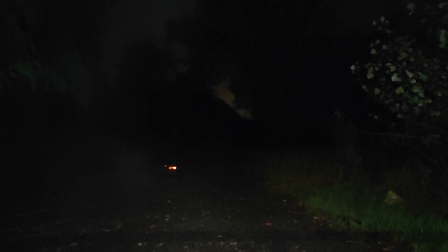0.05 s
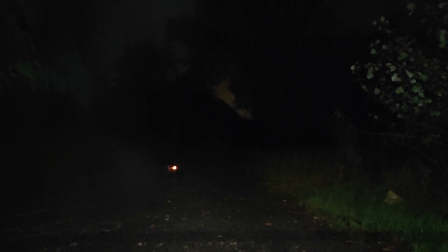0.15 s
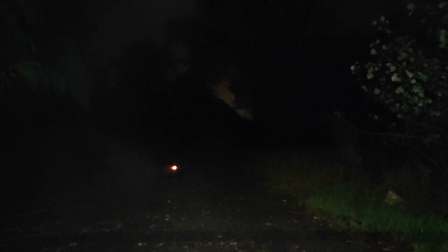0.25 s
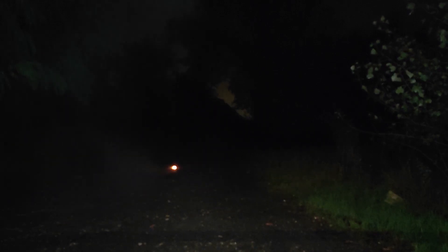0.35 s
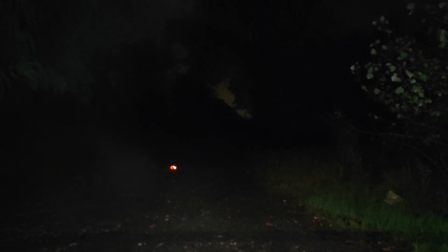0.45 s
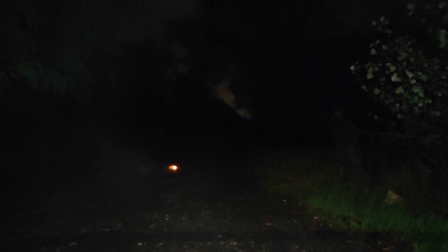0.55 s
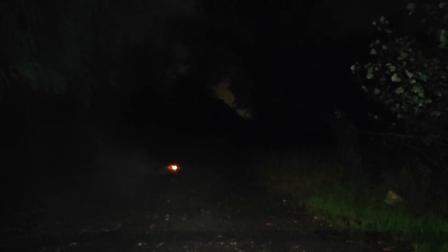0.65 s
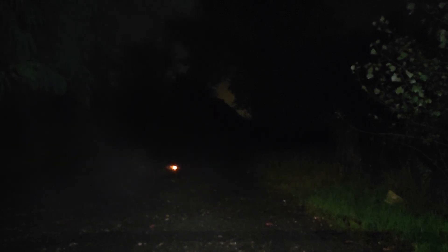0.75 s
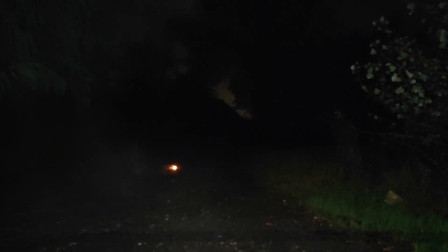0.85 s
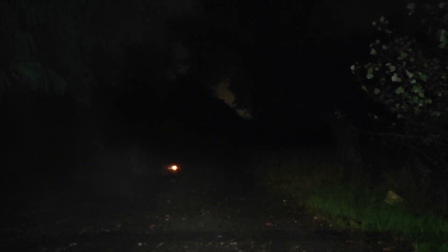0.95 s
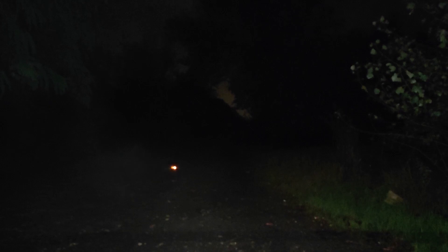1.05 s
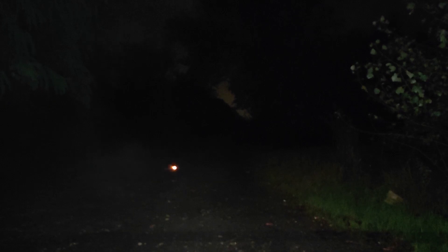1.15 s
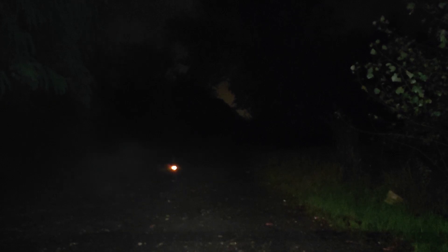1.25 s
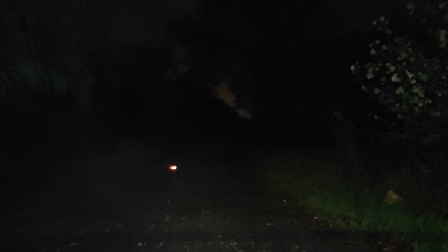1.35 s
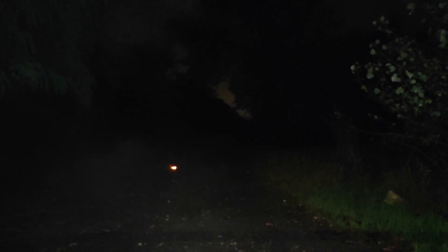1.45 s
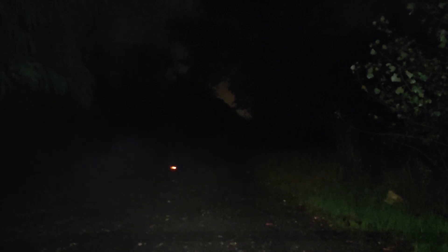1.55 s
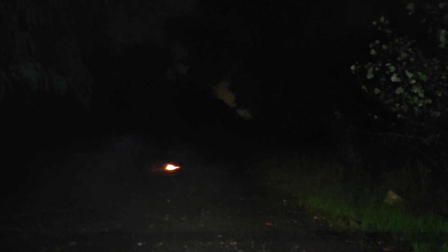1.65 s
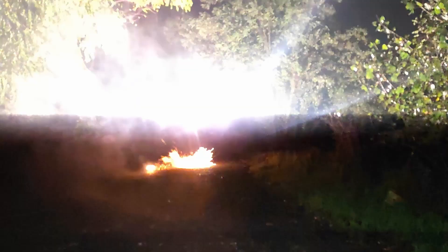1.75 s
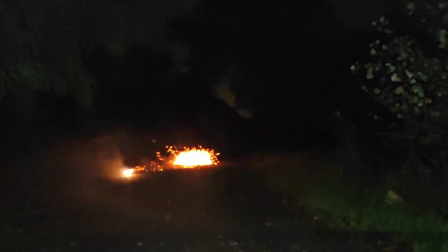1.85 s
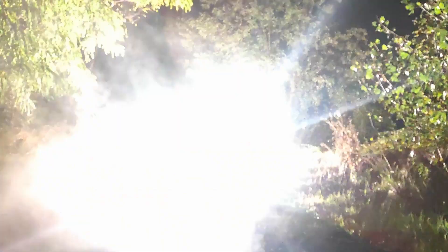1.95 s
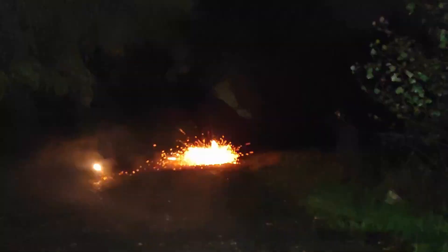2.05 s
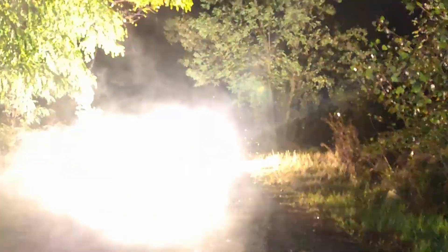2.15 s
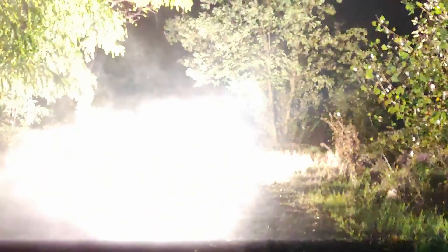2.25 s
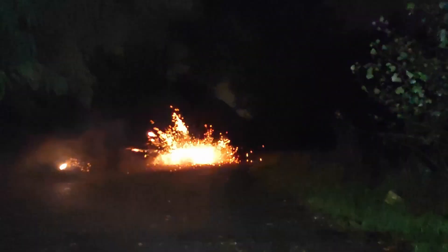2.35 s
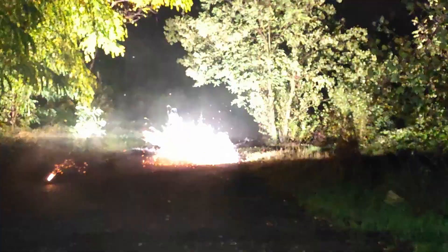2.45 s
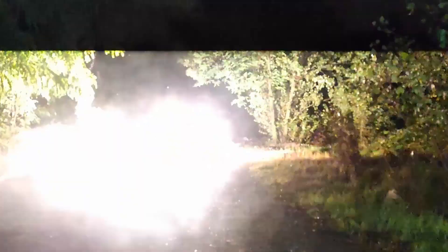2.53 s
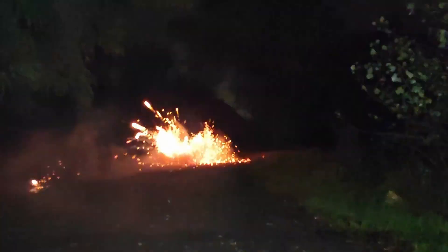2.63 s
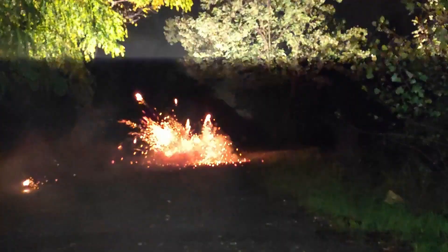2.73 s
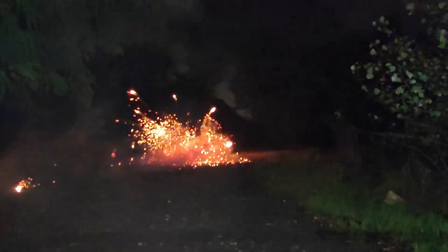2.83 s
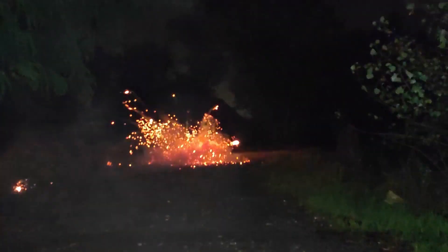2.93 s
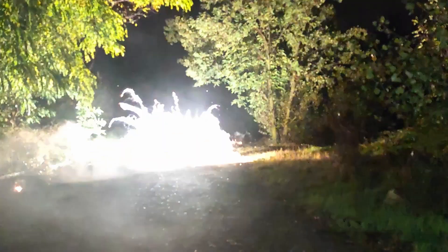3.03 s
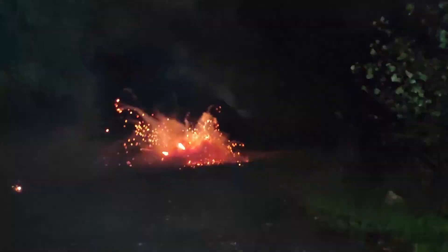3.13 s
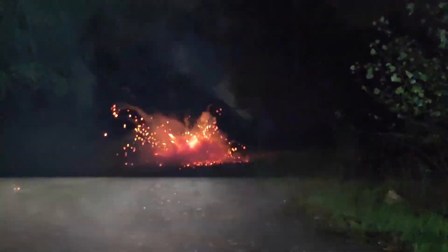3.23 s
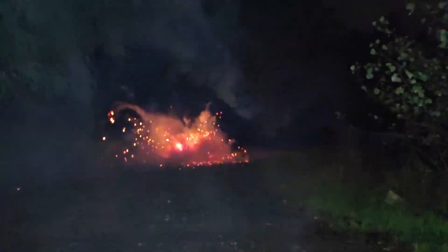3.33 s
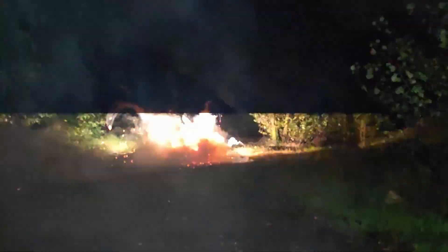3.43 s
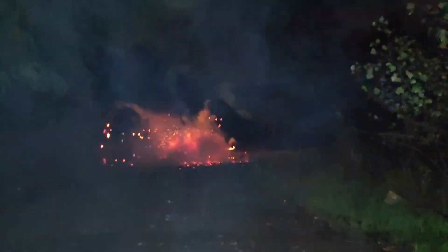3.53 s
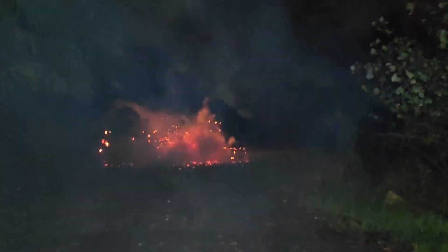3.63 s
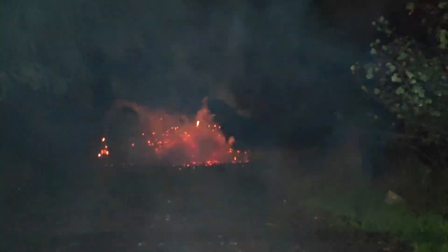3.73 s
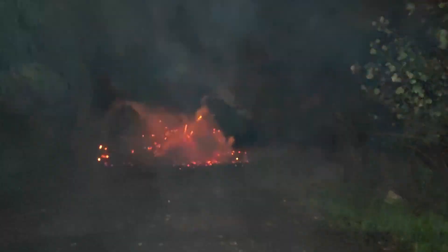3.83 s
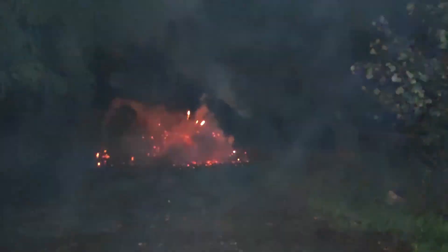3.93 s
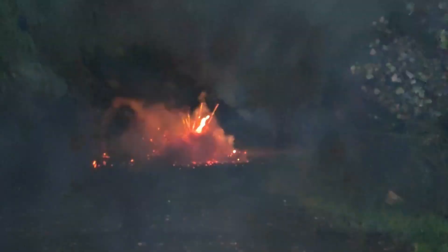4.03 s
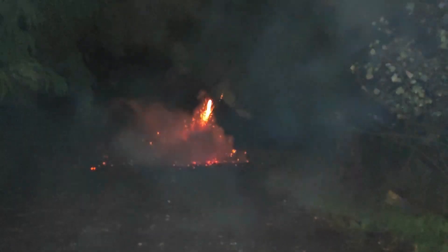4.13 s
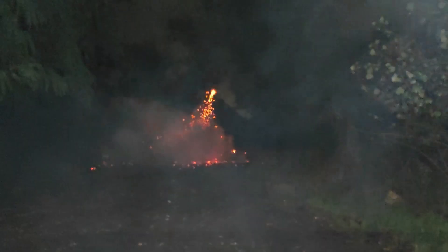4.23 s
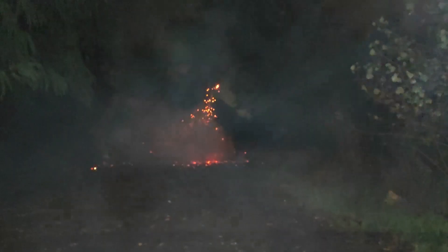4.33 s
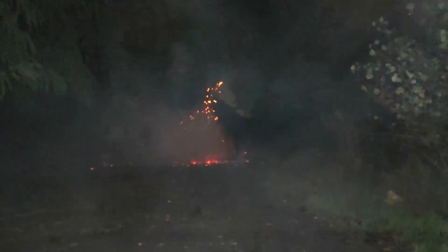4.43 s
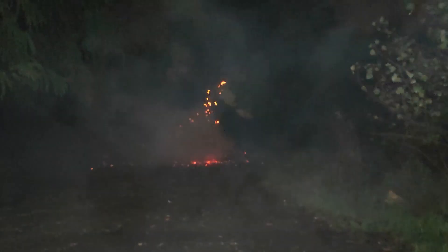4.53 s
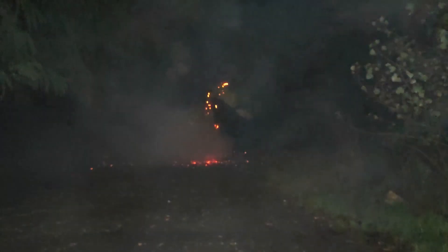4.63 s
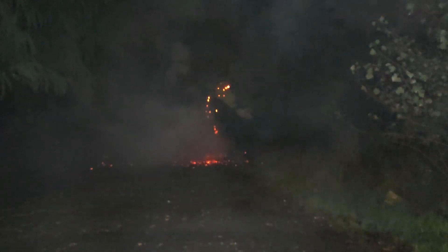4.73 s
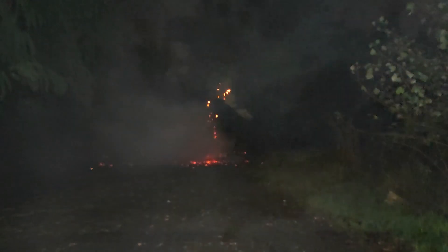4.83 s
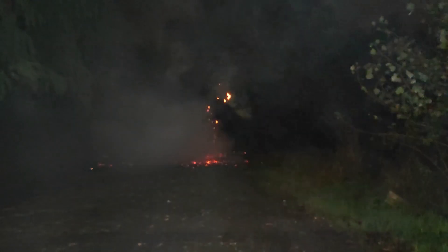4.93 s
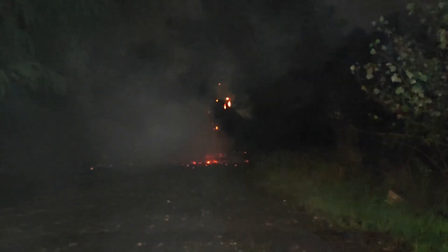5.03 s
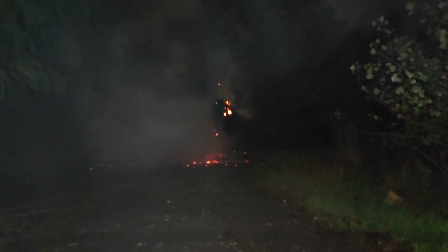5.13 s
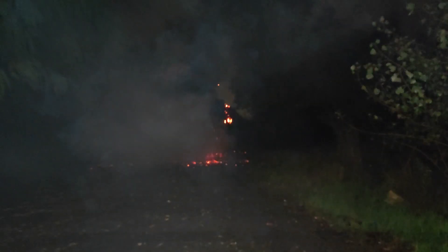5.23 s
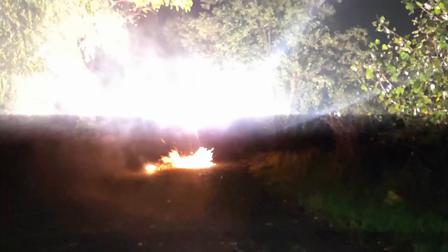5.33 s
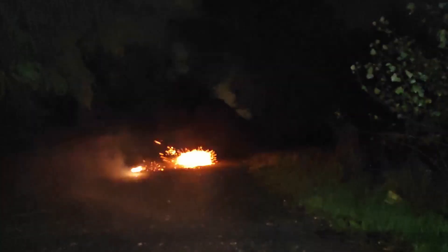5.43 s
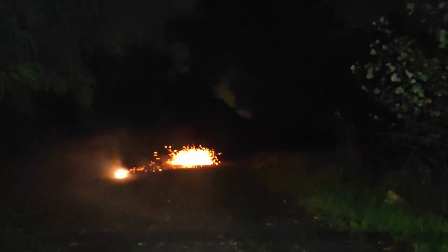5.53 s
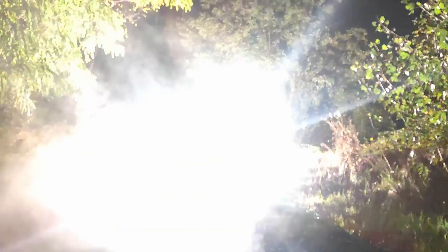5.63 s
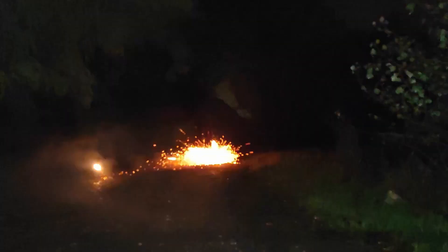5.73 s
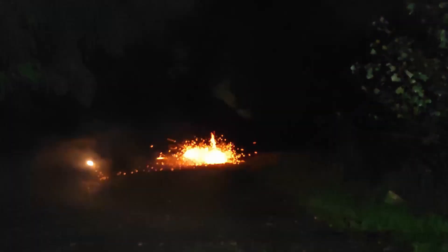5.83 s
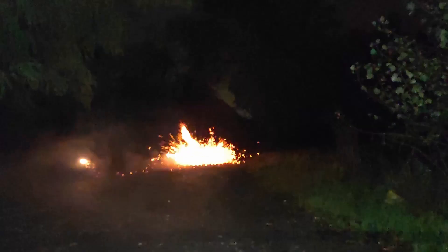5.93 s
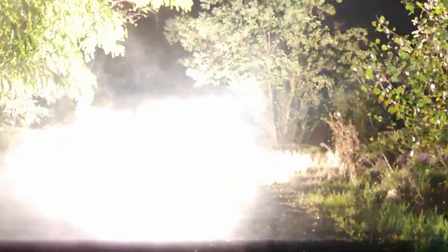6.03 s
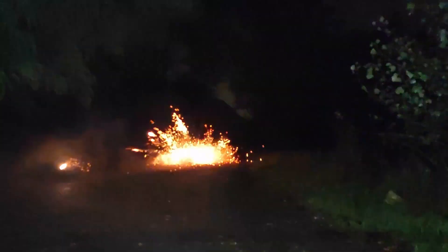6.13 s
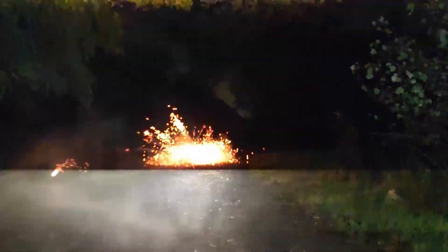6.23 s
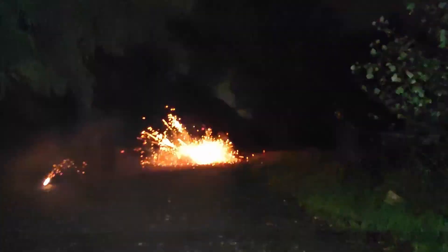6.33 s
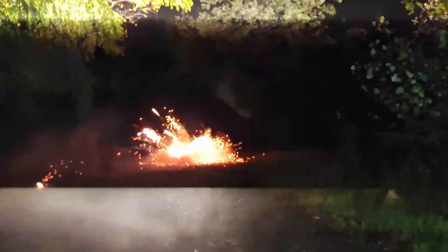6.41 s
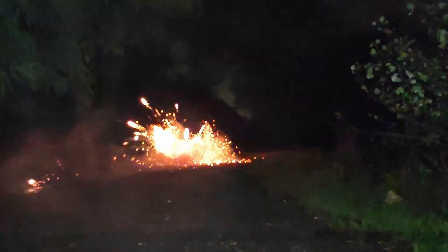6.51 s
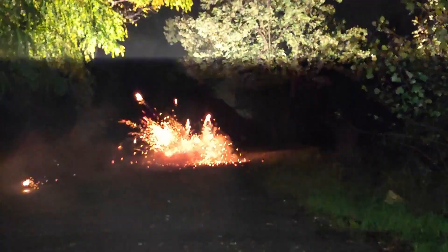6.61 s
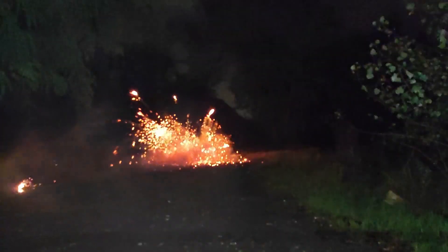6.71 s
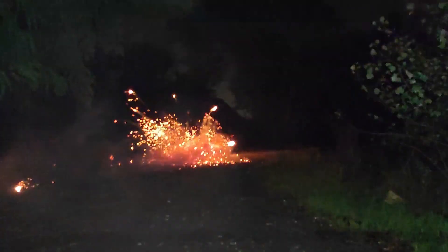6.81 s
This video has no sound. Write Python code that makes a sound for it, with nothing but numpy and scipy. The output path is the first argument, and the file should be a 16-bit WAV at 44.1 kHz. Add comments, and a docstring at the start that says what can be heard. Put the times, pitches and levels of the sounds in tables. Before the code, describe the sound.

Nearly two seconds of quiet night hiss, then an abrupt, overloaded barrage of firecrackers between trees, heard in wide stereo on a phone nearby. Sharp bangs poke out of a continuous popping roar that dulls after each one. A hollow, uneven far rumble follows and fades. After a brief abrupt hush, another loud burst arrives, with rounder, heavier thuds amid washed-out clatter, still going when it ends.

```python
"""Firecrackers on a wet lane

A burst of firecrackers between trees at night, a phone some metres away, then a second stretch that sounds
as if slowed down, its bangs blunt and smeared. Blast waves, shaped as pulses, stand out of a roar of popping
noise that dulls after each bang. After the first burst low rings in a rolling far rumble are cut to a brief
near silence; a faint night hiss lies under it all. The phone's limiter ducks the loudest peaks."""
import sys
import numpy as np
from scipy import signal
from scipy.fft import rfft, irfft
from scipy.io import wavfile
from scipy.ndimage import uniform_filter1d, minimum_filter1d

SR = 44100
rng = np.random.default_rng(int(sys.argv[2]) if len(sys.argv) > 2 else 0)


def wrap_up_sound(samples):
    """Save the sound to the file named by the first command line argument, as 16-bit audio."""
    columns = np.atleast_2d(samples).T
    # keep every value between -1 and 1, then stretch to whole-number steps
    tamed = np.clip(columns, -1, 1)
    steps = np.round(tamed * 32767).astype(np.int16)
    wavfile.write(sys.argv[1], SR, steps)


N = 302967

# Blasts that reach the phone directly. Each row: time in seconds, nominal level of the suck in dB, centre in Hz,
# push length in ms, push in dB and rebound in dB against the suck, tree echoes in dB against the blast,
# treble power it gives the roar in dB.
BLASTS = [(1.8890, -1.5, 520, 0.36, -4.5, -2.5, -16.5, -5.5), (2.053, -17, 240, .3, -6, -18, -27, -9),
          (2.1085, -1, 560, 0.63, -19, -14, -10.5, -3), (2.3063, -1, 480, 0.69, -14, -4.5, -15, -3),
          (2.404, -2.5, 363, 0.62, -14, -13, -32, -6.5), (2.5477, 1, 304, 0.66, -8, -16, -28, -6),
          (2.5964, -1, 350, 0.85, -1, -17, -42, -10), (2.684, -1.5, 298, 0.77, -6.5, -15, -22, -5),
          (2.7324, -4, 330, 0.87, 3, -10, -13.5, -12), (2.8581, 0, 357, 0.7, -3, -17, -19, -9.5),
          (3.1296, 3.5, 400, 0.13, -1, -17, -20, -6), (3.1794, -5, 340, 0.56, 2, -15, -16.5, -15),
          (3.234, -5, 330, 0.73, -1, -17, -23, -6.5), (3.404, -0.5, 334, 0.84, 0, -19, -26, -7),
          (3.5345, -4.5, 275, 0.47, 1, -18, -29, -6.5), (3.6009, -6, 298, 0.24, 4, -15, -32, -7),
          (3.752, 1.5, 445, 0.34, 0, -32, -15, -7.5), (3.9349, -1.5, 302, 0.43, 4.5, -16, -26, -4.5),
          (3.9390, -8, 900, 0.47, -1, -19, -15.5, -12), (4.019, -0.5, 270, 0.36, 0, -17, -21, -14),
          (4.1301, -0.5, 219, 0.51, -11, -5, -12, -5.5)]
# Blunt bangs of the second burst. Each row: time in seconds, nominal level in dB, centre in Hz, width in ms,
# signed gain (positive a hump, negative a hollow), tree echoes in dB against the thud,
# treble power it gives the roar in dB.
THUDS = [(5.496, -8, 131, 3.1, -1.04, -13, -0.5), (5.715, -12, 252, 2, 0.87, -32, -5),
         (5.7900, -12, 440, 1.6, 1, -9, -1.5), (6.053, -6, 180, 4.2, 0.88, -11, -1),
         (6.183, -3.5, 280, 1.4, 1, -34, -4), (6.3734, -2.5, 235, 2.1, 1, -15, -7.5),
         (6.435, -9, 300, 1.2, 1, -32, -12), (6.4396, -3.5, 310, 2.5, 1, -36, -8),
         (6.557, -3, 260, 1.3, 0.85, -9, -6), (6.6206, -7, 343, 2.6, -1.16, -10, -3.5),
         (6.7882, -5, 213, 2.3, -1.1, -12.5, -5)]
# Crackers broken up by trunks and leaves. Each row: time in seconds, nominal level in dB, centre in Hz,
# crack against body in dB.
CLATTERS = [(1.837, -26, 690, 16), (1.865, -10, 640, -2), (1.911, -10, 430, -6), (1.941, -24, 550, 2),
            (1.957, -9.5, 550, 0), (2, -17, 390, -3), (2.047, -14, 500, 7), (2.076, -17, 408, -11),
            (2.131, -6, 570, -20), (2.166, -9, 603, -4), (2.188, -6, 625, -17), (2.228, -12, 597, 3),
            (2.256, -13, 530, -1), (2.278, -10, 537, -3), (2.329, -9.5, 567, -13), (2.377, -12, 500, 2),
            (2.427, -12, 523, -17), (2.453, -11, 500, -14), (2.465, -12.5, 350, 4.5), (2.498, -13, 606, 0),
            (2.56, -13, 450, -14), (2.643, -14.5, 500, -1), (2.882, -18, 500, -13), (2.69, -9, 500, 0.5),
            (2.707, -9, 506, -11), (2.757, -9, 457, -14), (2.843, -10, 330, 0), (2.901, -10, 500, -3),
            (2.909, -9, 440, 0.5), (2.966, -10, 510, 2.5), (3.073, -9, 292, -7), (3.088, -10.5, 380, -3),
            (3.111, -4.5, 540, -1), (3.281, -8, 443, 3), (3.337, -10.5, 500, -2), (3.386, -15, 337, -6),
            (3.447, -7, 467, -1.5), (3.502, -18, 420, 6), (3.573, -14, 500, 4.5), (3.636, -10.5, 480, 3),
            (3.694, -11.5, 397, 4), (3.791, -8.5, 565, -1.5), (3.847, -9.5, 310, 2), (3.969, -9, 464, -7),
            (3.975, -21, 1210, -3), (4.055, -8.5, 520, 1.5), (4.109, -8, 367, -5), (5.46, -9, 526, -2),
            (5.52, -7, 657, -15), (5.538, -20, 450, -9), (5.566, -16, 550, -3), (5.585, -12.5, 510, -5),
            (5.745, -11, 550, -7), (5.904, -18, 450, -11), (6.138, -11, 250, -2), (6.455, -11, 500, -1),
            (6.572, -10.5, 450, 0.5), (6.645, -10, 480, -5), (6.745, -14, 400, -5), (5.818, -7, 620, -15),
            (5.875, -9.5, 620, -2), (5.891, -6, 700, -16), (6.014, -10, 454, -15), (6.082, -9, 617, -14),
            (6.119, -13, 1110, -7), (6.146, -17, 380, 6), (6.216, -13.5, 568, -14), (6.26, -11, 500, 3.5),
            (6.297, -11, 400, -5), (6.692, -14, 680, -7), (6.767, -7, 380, -18), (6.848, -7, 455, -1)]
# Level of the roar of small crackers, one curve a burst. Each row: time in seconds, relative level in dB.
ROAR_LEVELS = [
    [(1.68, -81), (1.77, -52.5), (1.826, -26.5), (1.838, -22), (1.85, -24), (1.864, -15.5), (1.876, -23),
     (1.9, -22), (2.5, -20.5), (2.82, -20), (2.93, -20.5), (3.07, -25), (3.16, -20.5), (3.5, -22.5),
     (4.08, -21), (4.18, -17), (4.36, -23), (4.42, -23.5), (4.59, -30.5), (4.65, -24.5), (4.8, -28.5),
     (4.95, -36.5), (5.305, -42.5), (5.32, -52)],
    [(5.32, -56), (5.35, -48), (5.415, -28), (5.428, -19.5), (5.442, -20.5), (5.46, -17.5), (5.484, -25.5),
     (5.5, -17.5), (5.52, -22.5), (5.95, -20.5), (6.03, -21), (6.87, -21)],
]
# Tone of the roar. Each row: frequency in Hz, relative level in dB per Hz.
ROAR_COLOUR = [(35, -42), (60, -9), (197, 0.5), (436, 1), (1370, -4), (1940, -5), (3020, -7.5),
               (4590, -14.5), (5040, -13), (6990, -21), (8030, -20.5), (8820, -33.5), (9600, -30),
               (11100, -30), (15800, -31)]
# Moments up to which each burst's opening treble is held, in seconds.
FRESH_UNTIL_S = [1.71, 5.43]
# Low echoes from far away. Each row: time of the hump in seconds, peak in dB, ring in Hz.
FAR_RINGS = [(4.1645, -6.5, 296), (4.194, -6, 171), (4.2202, -5, 218), (4.3152, -8, 180), (4.350, -7, 170),
             (4.391, -12, 130), (4.4349, -2, 169), (4.4381, -2, 230), (4.5112, -2.5, 163),
             (4.5713, -11, 170), (4.699, -4, 160.3), (4.737, -6, 120), (4.7492, -10, 169),
             (4.7727, -9, 190), (4.7782, -11, 190), (4.825, -16, 160), (4.9915, -16, 166),
             (5.155, -18, 180), (5.2143, -11, 151)]
# Level of the far rumble. Each row: time in seconds, relative level in dB.
RUMBLE_LEVEL = [(4.1, -25), (4.126, -21), (4.3, -19), (4.47, -15), (4.525, -11.5), (4.556, -19),
                (4.756, -13), (4.968, -22.5), (5.08, -25), (5.222, -22.5), (5.303, -26), (5.318, -39)]
# Tone of the far rumble. Each row: frequency in Hz, relative level in dB per Hz.
RUMBLE_COLOUR = [(25, -12), (45, -10), (70, 10), (120, 13), (200, 12), (320, 4.5), (600, -10), (1200, -16),
                 (2400, -52)]
# Tone of the night air. Each row: frequency in Hz, relative level in dB per Hz.
NIGHT_COLOUR = [(12, -36), (20, -6), (95, -4), (215, -13), (300, -18), (345, -18.5), (1150, -24.5),
                (1250, -24), (7650, -42.5), (8790, -49), (15800, -36)]
# How alike left and right are, before the ripple of the tree lines. Each row: frequency in Hz, correlation.
LIKENESS = [(25, 0.5), (60, 0.92), (130, 0.97), (290, 1), (640, 0.51), (1300, -0.16), (2500, 0.15),
            (7000, 0.1), (15000, 0.15)]
# The same for the far rumble. Each row: frequency in Hz, correlation.
FAR_LIKENESS = [(25, .9), (60, .998), (200, .998), (400, 1), (800, .5), (1600, 0)]
# Stereo balance. Each row: frequency in Hz, left minus right in dB.
BALANCE_DB = [(60, -1.5), (110, 0.5), (200, -0.5), (380, 0), (700, -0.5), (1290, -1.5), (2380, 0.5),
              (4400, 1.5), (8120, 0), (15000, 3.5)]

SECOND_BURST_S = 5.32
TIME_S = np.arange(N) / SR
HZ = np.maximum(np.arange(N // 2 + 1) * SR / N, 1.)  # frequency grid, kept above zero for logarithms


def bangs():
    """Blasts and thuds at both ports, with echoes scattered by the trees and a knock to the membranes."""
    lead_s, right_lag_s = 0.012, 0.00032
    out = np.zeros((2, N))
    t = np.arange(int(.4 * SR)) / SR
    waves = []
    for s, db, hz, push_ms, push_db, rebound_db, echo_db, _ in BLASTS:
        waves.append((s, db, echo_db, 0, blast(t - lead_s, hz, push_ms, push_db, rebound_db)))
    for s, db, hz, width_ms, sign, echo_db, _ in THUDS:
        waves.append((s, db, echo_db, right_lag_s, sign * thud(t - lead_s, hz, width_ms)))
    opposite = np.array([[1], [-1]])  # left up, right down
    chance = rng.standard_normal((len(waves), 3, len(t)))
    for (s, db, echo_db, lag_s, wave), (*noise, luck) in zip(waves, chance):
        # a weaker copy follows about 1.4 ms later
        copy_lag = int(0.00138 * SR * undb(5.1 * luck[0]))
        wave = wave + undb(-12.0) * np.roll(wave, copy_lag)
        right = np.roll(wave, int(lag_s * SR + 3 * abs(luck[1])))
        ports = np.array([wave, right]) * undb(luck[2] * opposite)

        echoes = np.array(noise) * np.exp(-t / 0.0041) * np.minimum(t / 0.0058, 1)
        scatter = signal.fftconvolve(echoes, wave[None, :1200])[:, :len(t)]
        scatter = band_pass(scatter, 310.0, 3600.0) * undb(echo_db)
        # the lows reach both ports alike
        scatter = scatter[0] + opposite * 1.2 * band_pass(scatter[1], 450.0, 8000.)

        # the blast knocks both membranes off centre; they creep back and swing past rest
        age = np.maximum(t - lead_s, 0)
        creep = (1 - age / 0.061) * np.exp(-age / 0.078) * (1 - np.exp(-age / 0.0023))
        push = -1 + 0.33 * luck[3] + 0.49 * luck[4:6, None]
        knock = push * undb(-25.0) * creep
        add(out, s - lead_s, undb(db) * (ports + scatter) + knock)
    return out


def blast(t, hz, push_ms, push_db, rebound_db):
    """A push that snaps over into a suck at t = 0, then swings back."""
    push = undb(push_db) * np.sin(np.pi * np.clip(-t / (push_ms / 1000), 0, 1)) ** 0.5
    late = np.maximum(t, 0)
    suck = (1 - np.exp(-late / 0.000096)) * np.exp(-(late * hz / 0.45) ** 2)
    back = np.maximum(late - 0.39 / hz, 0) / 0.00093
    rebound = undb(rebound_db) * back * np.exp(1 - back)
    wave = signal.lfilter(*signal.butter(2, 3200.0 / (SR / 2)), push - 1.13 * suck + rebound)
    return signal.lfilter(*signal.butter(1, 0.083 * hz / (SR / 2), "high"), wave)


def thud(t, hz, width_ms):
    """A pointed hump between dips, an overtone on its tip and a slow thump under it."""
    hull = np.exp(-(np.abs(t) / (width_ms / 1000)) ** 1.85)
    overtone = 0.5 * np.cos(2 * np.pi * 2.15 * hz * t + 0.55)
    swing = np.cos(2 * np.pi * hz * t) + overtone
    thump = 0.27 * np.sin(2 * np.pi * 140.0 * t) * np.exp(-(t / 0.0032) ** 2)
    return 0.8 * swing * hull + thump


def clatters():
    """Crackers heard as a few ms of close echoes: a body largely shared by both sides under a wide crack."""
    out = np.zeros((2, N))
    t = np.arange(int(.04 * SR)) / SR
    hull = (t / .0025) * np.exp(1 - t / 0.0036)
    chance = rng.standard_normal((len(CLATTERS), 3, len(t)))
    for (s, db, hz, crack_db), (left, right, shared) in zip(CLATTERS, chance):
        sides = np.array([left, right])
        # trunks return the body
        body = unit(band_pass(hull * (shared + 0.14 * sides), 0.5 * hz, 1.56 * hz))
        crack = unit(band_pass((hull + 0.47 * np.exp(-t / 0.016)) * sides, 940.0, 3600.0))
        add(out, s - .0025, undb(db - 15.0) * (body + undb(crack_db) * crack))
    return out


def roar():
    """Dense crackers in third-octave bands; the longer the path, the more treble the air takes."""
    bright_db = -19.5  # treble power at which the air leaves the colour as it is
    dip_db, treble_db, body_db = freshness()
    first_db, second_db = (along_time(burst) for burst in ROAR_LEVELS)
    level_db = np.where(TIME_S < SECOND_BURST_S, first_db, second_db) + dip_db
    level_db[:int(ROAR_LEVELS[0][0][0] * SR)] = -120

    both = stereo(*(rng.standard_normal((2, N)) + sharp_fronts()), ROAR_COLOUR)
    pops = crackle(per_s=220., spread_db=1.0, tail_s=0.0092, wash=0.091)
    out, reference = 0, 0
    for third in range(-13, 14):
        hz = 1000 * 2 ** (third / 3)
        window = np.cos(np.clip(3 * np.log2(HZ / hz), -1, 1) * np.pi / 2) ** 2
        # leaves scatter the treble most, so single pops survive in the lower bands
        popping = irfft(both * window, N) * unit(pops ** (1.38 / (1 + hz / 2000.0)))
        if 1 < third < 8:  # the middle bands set the overall level
            reference += np.mean(popping ** 2)
        air_db = (treble_db - bright_db) * (np.minimum(hz / 11900.0, 1) ** 0.88 - .25)
        body_share = 1 / (1 + (hz / 990.0) ** 2) + 1.4 / (1 + (hz / 83.0) ** 4)
        out = out + popping * undb(air_db + body_db * body_share + 1.06 * walk(14.))
    return (out / np.sqrt(reference) + membrane_wander()) * undb(level_db + 1.0)


def sharp_fronts():
    """Single sharp fronts, in mid and in side, that prick out of the wash and die out late in the first burst."""
    size_db = 7.0 + np.minimum(3.1 * rng.exponential(size=(2, N)), 8.)
    fronts = (rng.random((2, N)) < 500. / SR) * undb(size_db)
    fading = np.exp(-np.maximum(TIME_S - 4.25, 0) / 0.21)
    # one sign in mid and in side during the first burst, either sign in the second
    return fronts * np.where(TIME_S < SECOND_BURST_S, fading, rng.choice([-1, 1], size=(2, N)))


def membrane_wander():
    """The steady pounding lets the membranes wander slowly, further in the second burst."""
    wander_db = -17.5 + 2 * (TIME_S > SECOND_BURST_S)
    apart = np.array([walk(8.1), walk(12.0)])
    return band_pass(undb(wander_db) * (walk(21.0) + 0.4 * apart), 2.5, 35.)


def crackle(per_s, spread_db, tail_s, wash):
    """Envelope of random pops of uneven size, each smeared by the leaves, over a wash of older echoes."""
    size_db = np.minimum(spread_db * rng.exponential(size=N), 7.)
    pops = (rng.random(N) < per_s / SR) * undb(size_db)
    power = signal.lfilter([1], [1, -np.exp(-1 / (tail_s * SR))], pops ** 2)
    power = uniform_filter1d(power, size=60)
    return np.sqrt(wash + power / power.mean())


def freshness():
    """Each bang refreshes the roar, which dulls as echoes travel on: level dip, treble and body, in dB."""
    opening_treble_db = -6  # held while a burst opens
    # body before band weighting: at a bang, long after it, before the first bang of a burst
    full_body_db, thin_body_db, opening_body_db = 5.5, -4, -16.5
    times = np.array([row[0] for row in BLASTS + THUDS])
    onsets = [(row[0], row[-1]) for row in BLASTS + THUDS]
    onsets += [(until, opening_treble_db) for until in FRESH_UNTIL_S]
    # treble sinks fast at first, then more slowly
    early = after(onsets, db_per_s=73.5)
    late = undb(2 * -19) * after(onsets, db_per_s=30.5)
    bright = early + late + 1e-9

    last = np.searchsorted(times, TIME_S, side="right") - 1
    age = np.where(last < 0, np.inf, TIME_S - times[last])
    dip_db = -4.5 * np.exp(-age / 0.029)  # the roar sinks at a bang and returns
    body_db = thin_body_db + (full_body_db - thin_body_db) * np.exp(-age / 0.015)
    for begins, until in zip((0, SECOND_BURST_S), FRESH_UNTIL_S):
        first_bang = times[times > begins][0]
        bright[(TIME_S >= begins) & (TIME_S < until)] = undb(2 * opening_treble_db)
        body_db[(TIME_S >= begins) & (TIME_S < first_bang)] = opening_body_db
    return dip_db, 10 * np.log10(bright), body_db


def after(onsets, db_per_s):
    """Power that jumps at each (seconds, dB) onset and then sinks steadily."""
    kicks = np.zeros(N)
    for s, db in onsets:
        kicks[int(s * SR)] += undb(2 * db)
    return signal.lfilter([1], [1, -undb(-2 * db_per_s / SR)], kicks)


def roll():
    """Far slopes send the bangs back as low rings in an uneven rumble, cut short at the end."""
    begin_s, end_s = RUMBLE_LEVEL[0][0], RUMBLE_LEVEL[-1][0]
    heard = (np.arange(N) > begin_s * SR) & (np.arange(N) < end_s * SR)
    rumble = unit(irfft(stereo(*rng.standard_normal((2, N)), RUMBLE_COLOUR, FAR_LIKENESS), N))
    rumble = unit(rumble * crackle(per_s=82.0, spread_db=-2.0, tail_s=0.0041, wash=2.6))
    out = rumble * heard * undb(along_time(RUMBLE_LEVEL) - 3.0)

    rise_s, fall_s = 0.0044, 0.0041
    t = np.arange(int(.05 * SR)) / SR - .015
    hull = np.exp(-(t / np.where(t < 0, rise_s, fall_s)) ** 2)
    for s, db, hz in FAR_RINGS:
        ring = np.cos(2 * np.pi * hz * t) * hull
        add(out, s + t[0], undb(db) * np.array([ring, ring]))
    return out


def night():
    """Faint low rumble and rain hiss: coloured noise whose level wavers slightly."""
    colour = NIGHT_COLOUR[1:]  # the lowest row stays out
    air = irfft(stereo(*rng.standard_normal((2, N)), colour) * (HZ > 18), N)
    return unit(air) * undb(-56 + .6 * walk(9.))


def stereo(mid, side, colour, likeness=LIKENESS):
    """Coloured spectra of left and right from two unrelated sounds, as alike as the table says."""
    # echoes from either side reach one port before the other
    tree_lag_s, tree_share = 0.00049, 0.062
    ripple = np.cos(2 * np.pi * HZ * tree_lag_s) - 1 / (1 + (HZ / 230.0) ** 2)
    like = np.clip(along_hz(likeness) + tree_share * ripple, -1, 1)
    m = rfft(mid) * np.sqrt(1 + like)
    s = rfft(side) * np.sqrt(1 - like)
    lean = undb(along_hz(BALANCE_DB) / 2)
    return undb(along_hz(colour)) * np.array([(m + s) * lean, (m - s) / lean])


def walk(rate):
    """Random levels drawn at a rate in Hz and slewed twice."""
    k = int(SR / rate)
    steps = np.repeat(rng.standard_normal(N // k + 1), k)
    return 2.0 * uniform_filter1d(uniform_filter1d(steps, k), k)[:N]


def band_pass(x, lo_hz, hi_hz):
    """Gentle band-pass."""
    return signal.sosfilt(signal.butter(2, [lo_hz, hi_hz], "band", fs=SR, output="sos"), x)


def along_hz(table):
    """A (Hz, value) table on the frequency grid, straight lines over log frequency."""
    hz, value = np.transpose(table)
    return np.interp(np.log(HZ), np.log(hz), value)


def along_time(curve):
    """A (seconds, value) curve, one value a sample."""
    s, value = np.transpose(curve)
    return np.interp(TIME_S, s, value)


def undb(db):
    """Gain of a level in dB."""
    return 10 ** (np.asarray(db) / 20)


def unit(x):
    """Scaled to rms 1."""
    return x / np.sqrt(np.mean(x ** 2))


def add(out, s, sound):
    """Mixes a sound in at time s."""
    i = int(s * SR)
    out[:, i:i + sound.shape[1]] += sound[:, :N - i]


def scene():
    """All sources at the two microphones."""
    return bangs() + clatters() + roar() + roll() + night()


def record(dry):
    """A limiter looks some ms ahead, ducks all sound before each blast and lets go soon after; the top is cut."""
    ahead, hold = int(0.019 * SR), int(0.0052 * SR)
    need = np.minimum(1.015 / (np.abs(dry).max(axis=0) + 1e-9), 1)
    lowest = np.roll(minimum_filter1d(need, ahead + hold), (hold - ahead) // 2)
    gain = uniform_filter1d(lowest, hold)
    rounded = np.tanh(.6 * dry * gain) / 0.58  # soft peaks
    top_cut = signal.ellip(10, .2, 80, 15900, fs=SR, output="sos")
    return np.clip(signal.sosfilt(top_cut, rounded), -1, 1)


dry = scene()
out = record(dry)
wrap_up_sound(out)
```